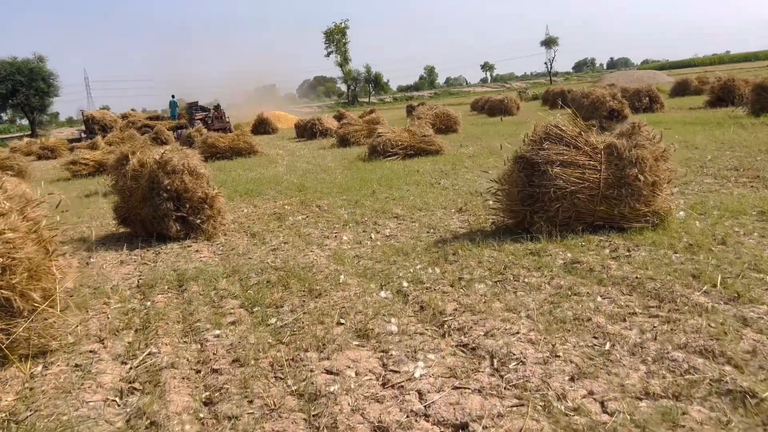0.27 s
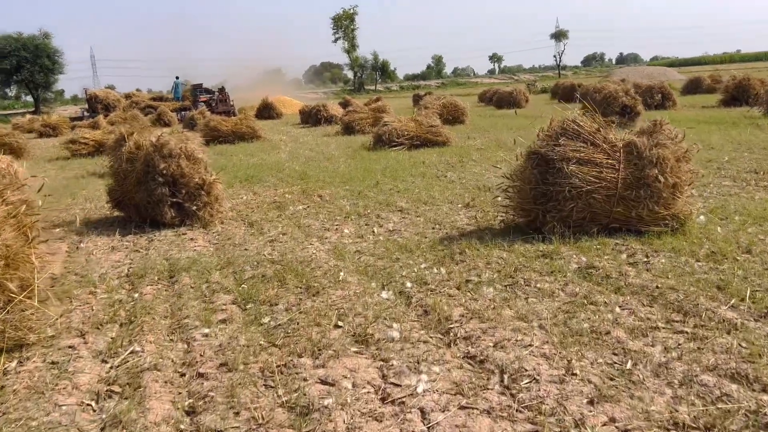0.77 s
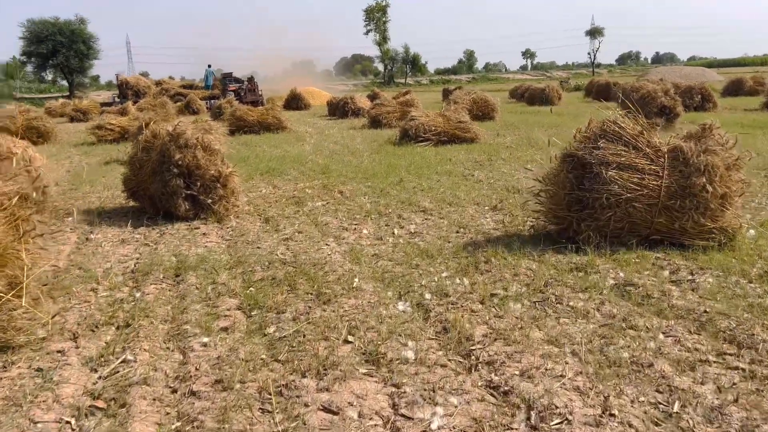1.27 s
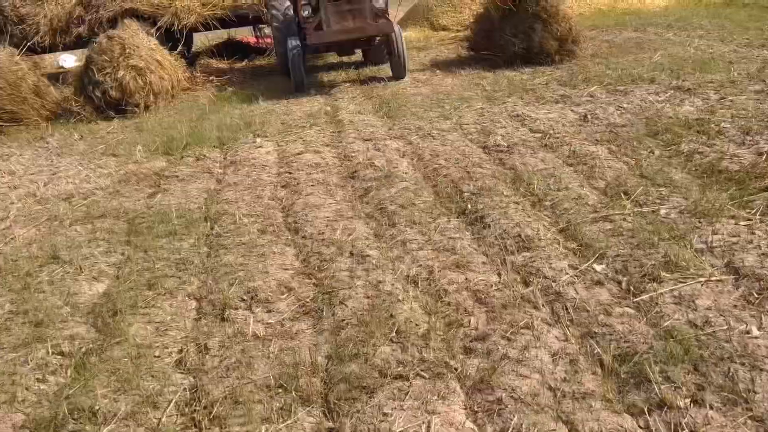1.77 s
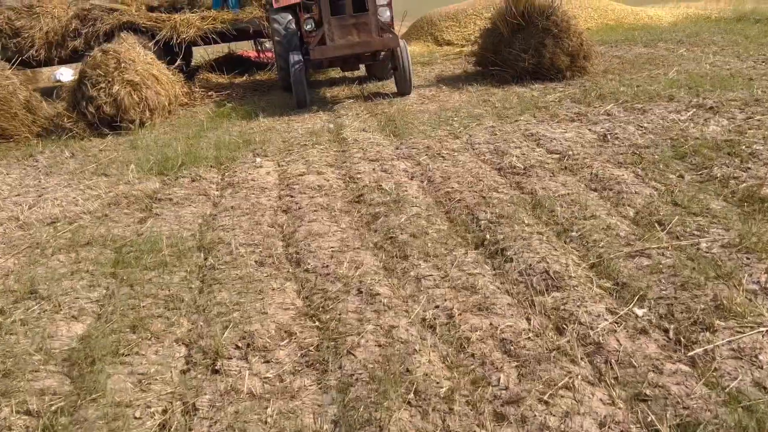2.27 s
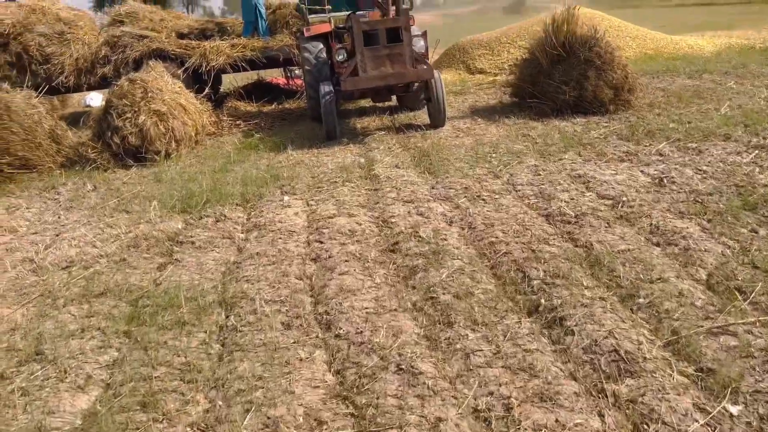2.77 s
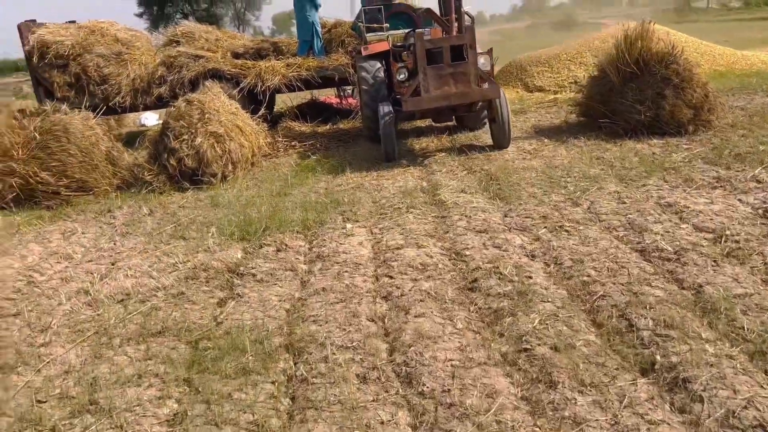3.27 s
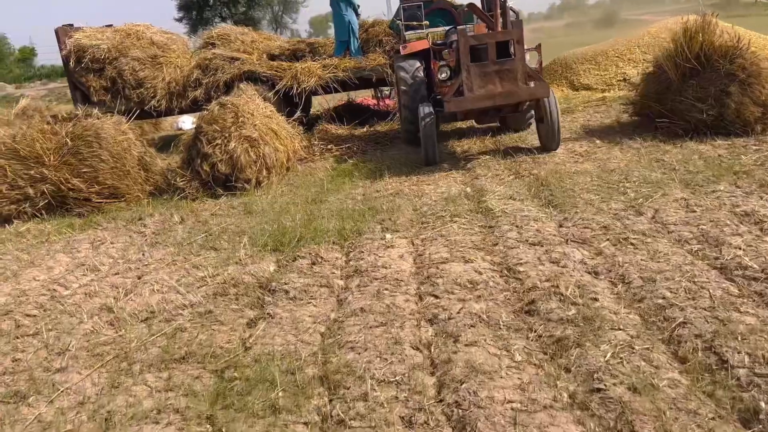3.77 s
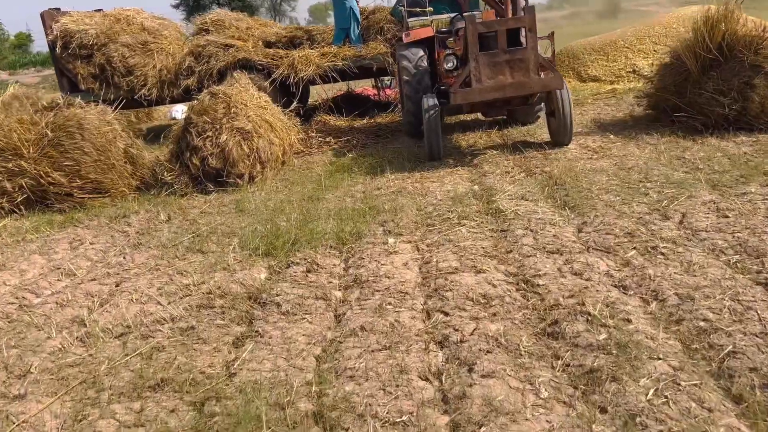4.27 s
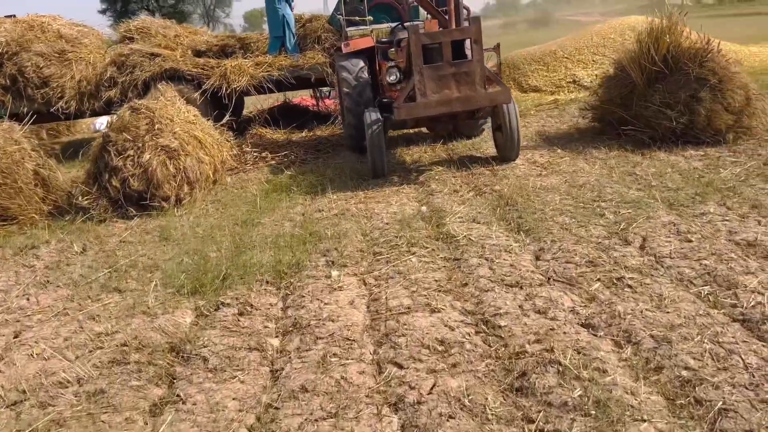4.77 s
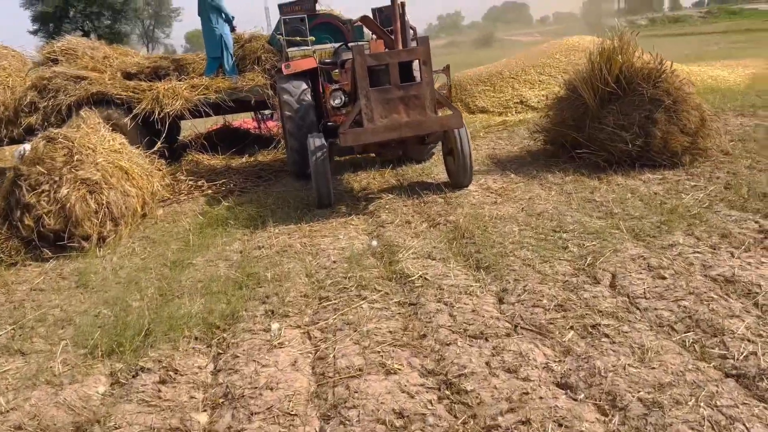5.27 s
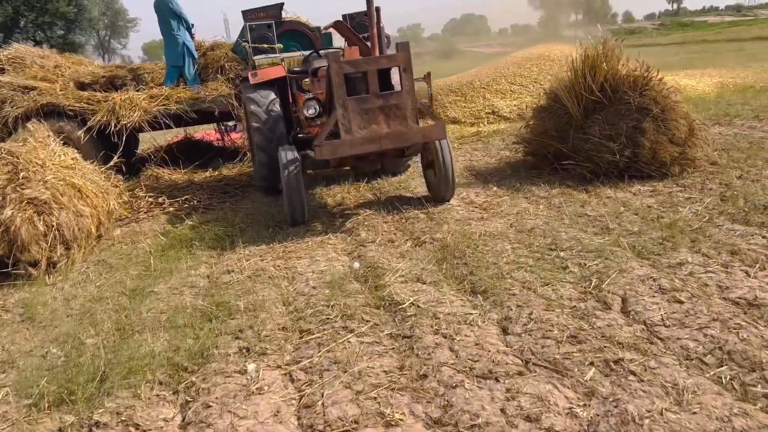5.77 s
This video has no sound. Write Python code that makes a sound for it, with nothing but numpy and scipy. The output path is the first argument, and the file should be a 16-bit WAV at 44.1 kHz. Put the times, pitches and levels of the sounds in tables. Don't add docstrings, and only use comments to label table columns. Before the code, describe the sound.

Outdoors in an open stubble field, a tractor engine and thresher hum faintly in the distance while dry stalks snap and clods knock underfoot at the start. The sound fades to a very short silence, then swells back much louder and closer: a deep, slowly beating hum, rough drum roar, light hiss and rattle. Footsteps crunch now and then, hardest near the end. Handheld stereo microphone.

```python
import sys
import numpy as np
from scipy import signal
from scipy.fft import rfft, irfft, next_fast_len
from scipy.io import wavfile
from scipy.ndimage import uniform_filter1d, map_coordinates

SR = 44100
rng = np.random.default_rng(int(sys.argv[2]) if len(sys.argv) > 2 else 0)


def undo_db(level):
    steps = np.asarray(level, float) / 20
    return 10 ** steps


def dump(signal):
    limited = np.clip(np.atleast_2d(signal).T, -1, 1)
    pcm = np.round(limited * 32767).astype(np.int16)
    wavfile.write(sys.argv[1], SR, pcm)


N = 265526
T = np.arange(N) / SR
CUT_S = 1.68


def unit(x):
    return x / np.sqrt(np.mean(x ** 2) + 1e-20)


def along(points, hz):
    f, v = np.transpose(points)
    return np.interp(np.log(hz + 1), np.log(f + 1), v)


def curves(rows, t):
    s, *columns = np.transpose(rows)
    return [np.interp(t, s, column) for column in columns]


def wobble(rate, t):
    coarse_s = t[::32] - t[0]
    knots = rng.standard_normal(int(2 * rate * len(t) / SR) + 9)
    return np.interp(t - t[0], coarse_s, map_coordinates(knots, [coarse_s * rate]))


def bumps(events, t):
    return sum(undo_db(db) * np.exp(-((t - s) / half_s) ** 2) for s, db, half_s in events)


def filtered(x, response):
    m = next_fast_len(x.shape[-1] + 4096)
    return irfft(rfft(x, m) * response(np.fft.rfftfreq(m, 1 / SR)), m)[..., :x.shape[-1]]


# order, engine_db, blower_db, lag_s of the cancelling moment
FAR_OVERTONES = [(2, -33.5, -40, 0.039), (3, -37, -47.5, 0.0079), (4, -46.5, -52, 0.0035),
                 (5, -47, -55.5, -0.01), (6, -48.5, -54.5, 0.0033), (7, -48, -61, -0.022),
                 (8, -54, -50, 0.0043)]
NEAR_OVERTONES = [(1, -59, -51, .01), (2, -17, -25, 0.019), (3, -21.5, -31, -0.0027), (4, -30, -31, -0.037),
                  (5, -31, -36, -0.041), (6, -44.5, -37.5, 0.0041), (8, -37, -38, 0.0018),
                  (10, -45, -41, 0.0096)]
# order of the full engine cycle, level_db under the strongest overtone
UNEVEN_CYLINDERS = [(5, -19), (7, -33), (10, -22.5), (11, -19), (14, -21), (17, -15), (20, -24.5),
                    (23, -16), (26, -18.5), (29, -20), (32, -22)]


def hum(t, cycles, overtones, meet_s, slip_hz):
    tone = np.zeros(len(t))
    jitter = 0.0056 * wobble(9.9, t)
    for k, engine_db, blower_db, lag_s in overtones:
        turns = k * (cycles + jitter) - 0.015 * k * k
        slipped = k * slip_hz * (t - meet_s - lag_s)
        tone += undo_db(engine_db + 0.44 * wobble(6, t)) * np.cos(2 * np.pi * turns)
        tone -= undo_db(blower_db + 1.74 * wobble(6.04, t)) * np.cos(2 * np.pi * (turns - slipped))
    top_db = max(row[1] for row in overtones)
    for k, db in UNEVEN_CYLINDERS:
        turns = k * cycles / 3 + rng.random()
        turns = turns + 0.0076 * k * wobble(9, t)
        tone += undo_db(top_db + db + 2.07 * wobble(4.94, t)) * np.cos(2 * np.pi * turns)
    return np.sqrt(2) * tone


# first_dip_hz, spacing_hz
FAR_COMB = [(510, 646), (638, 1080)]
NEAR_COMB = [(525, 623), (585, 880)]
# frequency_hz, share of the direct sound
ECHO_SHARE = [(150, .02), (350, 0.08), (520, 0.44), (2500, 0.14), (4500, 0.065), (7000, .05)]
# start_s, share
PATH_SWAY = [(0, -0.0042), (1.6, .015), (1.75, .05), (2.7, -0.083), (3.6, -0.057), (4.4, 0.037),
             (5.0, -0.024), (6.02, 0.036)]


def echo(hz, t):
    far = t[0] < CUT_S / 2
    first_hz, spacing_hz = np.transpose(FAR_COMB if far else NEAR_COMB)[:, :, None, None]
    follows = np.array([1, 0.6])[:, None, None]
    slide = 1 + follows * curves(PATH_SWAY, t)[0]
    turns = (hz[:, None] / slide - first_hz) / spacing_hz
    grazing = 1.5 if far else 1
    share = np.clip(along(ECHO_SHARE, hz) * grazing, 0, 1)[:, None]
    return 1 - share * np.exp(-2j * np.pi * turns)


# frequency_hz, likeness
PORT_LIKENESS = [(60, 0.96), (250, 1), (500, 0.62), (900, 0.86), (2000, 0.49), (3500, 0.64), (5000, 0.49),
                 (8000, 0.25), (10500, 0.37), (12400, 1), (15000, .99)]


def rush(t, gate, response, patchy_db):
    noise = gate * rng.standard_normal((2, len(t)))
    hz, s, (a, b) = signal.stft(noise, SR, nperseg=1024)
    patches = uniform_filter1d(rng.standard_normal(a.shape), size=8, axis=0)
    patches = unit(uniform_filter1d(patches, size=4, axis=1))
    turn = np.arccos(np.clip(along(PORT_LIKENESS, hz), 0, 1))[:, None] / 2
    common, differing = np.cos(turn) * a, np.sin(turn) * b
    pair = np.array([common + differing, common - differing])
    pair = pair * undo_db(patchy_db * patches) * echo(hz, s + t[0])
    return unit(filtered(signal.istft(pair, nperseg=1024)[1][:, :len(t)], response))


# frequency_hz, density_db
RUMBLE_SPECTRUM = [(20, -40), (32, -11), (45, -2.5), (60, -1), (100, -1.5), (200, 0.5), (300, -1.5),
                   (400, -5), (480, -13.5), (700, -38.5)]


def rumble(t, firing):
    return rush(t, firing, lambda hz: undo_db(along(RUMBLE_SPECTRUM, hz)), patchy_db=1.5)


# frequency_hz, density_db
FAR_DRUM = [(250, -35), (420, -8.5), (525, -6.5), (561, -16), (627, -6), (783, -8), (989, -6), (1180, -11),
            (1510, -6.5), (1690, -14), (2200, -9.5), (2580, -16), (2880, -13), (3180, -19.5), (6000, -24.5),
            (7800, -51), (13200, -120)]
NEAR_DRUM = [(250, -36), (420, -5.5), (531, -2), (627, -1), (678, -3.5), (925, -2), (1130, -7.5),
             (1260, -3.5), (1510, -5.5), (1710, -5.5), (2330, -14), (3080, -17), (3360, -17.5),
             (3640, -18.5), (6000, -25.5), (7800, -46), (13200, -120)]
# centre_hz, width_hz, level_db
SHEETS = [(629, 62, 4.5), (965, 134, 2), (1284, 25, 6.5), (1705, 62, 3.5), (2555, 33, 2.5), (3060, 92, 5.5),
          (3570, 37, 5.5)]
# frequency_hz, level_db
SIEVE_SPECTRUM = [(1800, -34), (2500, -5.5), (3100, -5), (3700, -4), (4600, -26)]
# start_s, level_db, half_length_s
SIEVES_SEEN = [
    (1.82, -7, .3),
    (5.356, -4, .2),
    (5.9, -2, .08),
]


def roar(t, firing, clatter, drum, sheets):
    def panels(hz):
        return undo_db(sum(db / (1 + (2 * (hz - centre) / width) ** 2) for centre, width, db in sheets))

    direct = rush(t, firing * clatter, lambda hz: undo_db(along(drum, hz)) * panels(hz), patchy_db=0.9)
    seen = undo_db(-15) + bumps(SIEVES_SEEN, t)
    return direct + seen * filtered(direct, lambda hz: undo_db(along(SIEVE_SPECTRUM, hz)) * panels(hz) ** 1.5)


# frequency_hz, density_db
HISS_SPECTRUM = [(2350, -23), (4000, -3.5), (6820, -3.5), (8260, -3), (10100, -8), (11800, -11),
                 (13300, -22), (14800, -13), (16000, -17.5)]


def hiss(t, firing, clatter):
    return rush(t, np.sqrt(firing) * clatter, lambda hz: undo_db(along(HISS_SPECTRUM, hz)), patchy_db=1.35)


# start_s, firing_rate_hz
FAR_FIRING = [(0.0, 37.5), (0.074, 37.8), (1.35, 38.4), (1.438, 37.5), (1.6, 39)]
NEAR_FIRING = [(1.8, 36.2), (1.94, 35.9), (4.75, 36.7), (4.87, 37), (5.54, 36.8), (5.69, 37.3),
               (6.02, 36.7)]
# start_s, level_db
DRUM_PRESENCE = [(0, 1.2), (.4, -0.1), (1.2, -0.2), (1.6, 1.5), (1.7, -2.5), (2.8, -1), (3.5, 0),
                 (4.3, -0.5), (4.75, 2), (5.6, 2), (6.02, 2)]


def machine(t, speed, overtones, beat, levels_db, drum, sheets, puff):
    cycles = np.cumsum(curves(speed, t)[0]) / SR
    presence_db, = curves(DRUM_PRESENCE, t)
    rumble_db, roar_db, hiss_db = levels_db
    firing = np.exp(puff * np.cos(2 * np.pi * cycles) + 0.073 * wobble(40, t))
    clatter = undo_db(1.3 * wobble(150, t) + 0.53 * wobble(11, t))
    mix = undo_db(0.36 * presence_db) * hum(t, cycles, overtones, *beat)
    mix = mix + undo_db(rumble_db + 0.8 * presence_db + 0.68) * rumble(t, firing)
    mix = mix + undo_db(roar_db + 1.2 * presence_db + 3.0) * roar(t, firing, clatter, drum, sheets)
    return mix + undo_db(hiss_db + 0.8 * presence_db + 3.0) * hiss(t, firing, clatter)


def place(out, s, sound):
    start = round(s * SR)
    out[:, start:start + sound.shape[-1]] += sound


# start_s, peak_db, left_minus_right_db
STALKS = [(0.0412, -30, -2.5), (0.0951, -28, 0.0), (0.1265, -21, 3), (.1375, -25, 0.5), (.1475, -31, 0.5),
          (0.176, -30, 0.5), (.1915, -38, 0.5), (0.2497, -37, 0.0), (0.4194, -44, 0.0), (0.4882, -33, -2),
          (0.9276, -23, 9), (1.009, -34, 1.5), (1.4794, -35, 1.0), (1.5894, -53, 0.5), (2.1858, -24, -0.5),
          (2.4373, -29, -1.0), (3.66, -15.5, 0.0), (4.5769, -28, -0.5), (4.766, -26, 0.5),
          (5.0413, -23, 0.0), (5.0593, -24, -2.0)]


def snaps(t):
    out = np.zeros((2, N + SR))
    for s, db, pan_db in STALKS:
        snap = signal.lfilter([1, -0.45], 1, rng.standard_normal(len(t))) * undo_db(-60 * t / 0.014)
        place(out, s, undo_db(db - 5.0 + pan_db * np.array([[0.5], [-0.5]])) * snap)
    return out[:, :N]


# start_s, peak_db, ring_hz, crack_db
CLODS = [(.111, -19.5, 470, -6), (0.123, -23, 650, -8), (.137, -22, 1800, -3.5), (.147, -17.5, 556, -4),
         (.159, -15, 870, -2), (.175, -8, 640, -8), (2.278, -18.5, 790, 2), (2.91, -14, 840, -17),
         (4.348, -18, 918, -4), (4.99, -6.5, 1470, 3), (5.062, -4.5, 780, -14), (5.663, -9.5, 726, 0.5),
         (5.703, -5, 820, -12)]
GRIT = signal.butter(4, [550, 2200], "bandpass", fs=SR, output="sos")


def knocks(t):
    out = np.zeros((2, N + SR))
    crumbling = undo_db(-60 * t / 0.011) + undo_db(-14 - 60 * t / 0.06)
    for s, db, hz, crack_db in CLODS:
        t60 = 9 / hz
        ring = np.sin(2 * np.pi * hz * t) * undo_db(-60 * t / t60)
        ring += 0.5 * np.sin(2 * np.pi * 1.75 * hz * t) * undo_db(-120 * t / t60)
        blow = 0.55 * rng.standard_normal(len(t)) - 8 * (t == t[20])
        crack = signal.sosfilt(GRIT, blow) * undo_db(crack_db + 7) * crumbling
        place(out, s, undo_db(db + 3) * (1 - np.exp(-t / 0.00041)) * (ring + crack))
    return out[:, :N]


# start_s, level_db, half_length_s
BRUSHES = [(0.138, -46, 0.033), (0.622, -55, 0.022), (1.022, -50, .02), (1.417, -54, 0.039),
           (2.137, -37, 0.042), (4.749, -34, 0.057), (4.957, -35, .01), (5.064, -41, .02)]
# frequency_hz, density_db
BRUSH_SPECTRUM = [(3000, -35), (6000, -4), (10000, -4), (15000, 4), (16000, -5)]


def rustle():
    noise = rng.standard_normal(N) + 0.36 * rng.standard_normal((2, N))
    crackle = undo_db(4.7 * wobble(300, T)) * noise
    return bumps(BRUSHES, T) * unit(filtered(crackle, lambda hz: undo_db(along(BRUSH_SPECTRUM, hz))))


def steps():
    t = np.arange(SR // 20) / SR
    return snaps(t) + knocks(t) + rustle()


def fade():
    hush_from_s, hush_to_s, gate_s = 1.654, 1.702, 0.006
    down, up = (CUT_S - T) / 0.17, (T - hush_to_s + gate_s) / 0.2
    ramp = np.clip(np.where(T < CUT_S, down, up), 0, 1)
    bent = np.sin(np.pi / 2 * ramp) ** np.where(T < CUT_S, 1, 1.67)
    return bent * np.clip(np.maximum(hush_from_s - T, T - hush_to_s) / gate_s, 0, 1) ** 2


def scene():
    far = machine(T[T < CUT_S], FAR_FIRING, FAR_OVERTONES, beat=(0.14, 0.776),
                  levels_db=(-38, -46, -59.5), drum=FAR_DRUM, sheets=SHEETS[:3], puff=0.11)
    near = machine(T[T >= CUT_S], NEAR_FIRING, NEAR_OVERTONES, beat=(2.31, 0.795),
                   levels_db=(-24, -27.5, -43.5), drum=NEAR_DRUM, sheets=SHEETS, puff=0.066)
    return np.hstack([far, near]) + steps()


def band_limit(x):
    return signal.sosfilt(signal.butter(12, 17010, fs=SR, output="sos"), x)


# frequency_hz, left_minus_right_db
PORT_TILT = [(60, -2.0), (110, -2.5), (200, -3), (380, -2), (700, -1), (1290, 1.5), (2380, -3.5),
             (4400, 1.5), (8120, -2.5), (15000, -1.5)]
# frequency_hz, left_lead_rad
PORT_LEAD = [(60, .04), (300, 0.18), (900, 0.81), (2000, 1.3), (5000, 1.54), (8000, 1.4), (10800, 1.5),
             (12300, .2), (13050, 3.6), (13700, 3.5), (14400, 0.5), (16000, 1)]


def record(dry):
    half = np.array([[0.5], [-0.5]])

    def ports(hz):
        return undo_db(half * along(PORT_TILT, hz)) * np.exp(1j * half * along(PORT_LEAD, hz)) * (hz < 15900)

    heard = filtered(dry, ports) * fade()
    soft = heard / (1 + np.abs(heard) ** 8) ** (1 / 8)
    return band_limit(soft)


dry = scene()
out = record(dry)
dump(out)
```